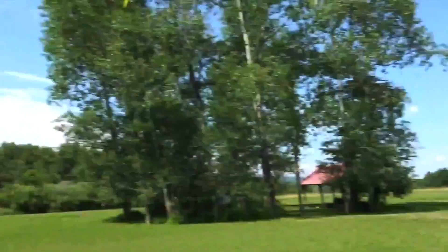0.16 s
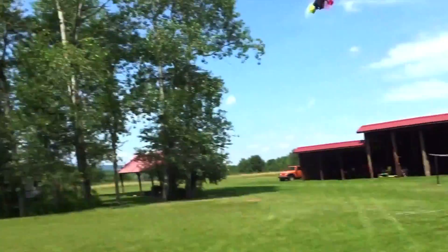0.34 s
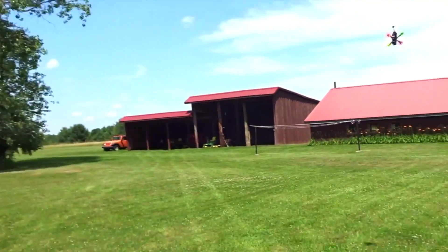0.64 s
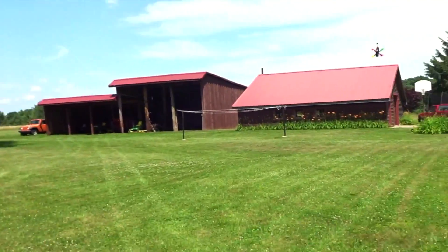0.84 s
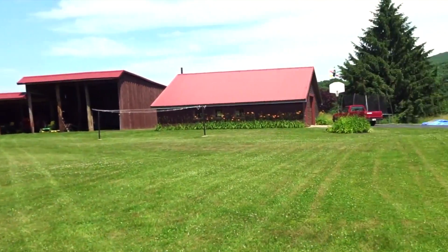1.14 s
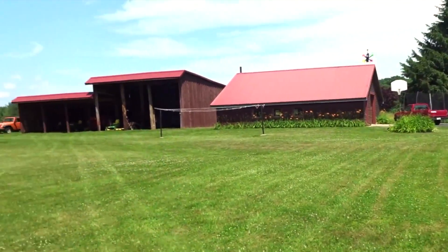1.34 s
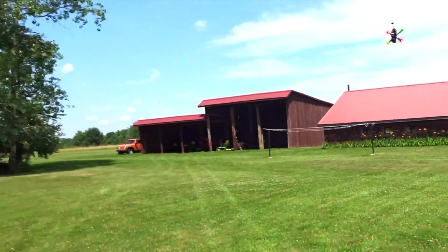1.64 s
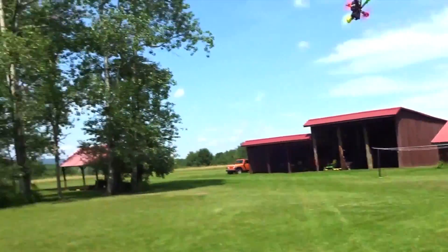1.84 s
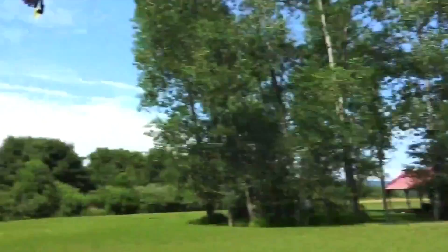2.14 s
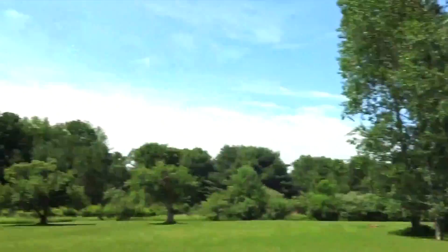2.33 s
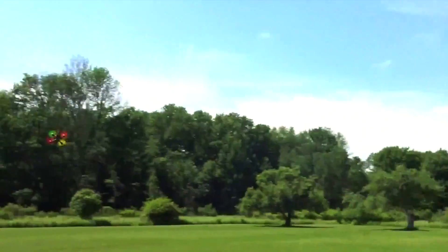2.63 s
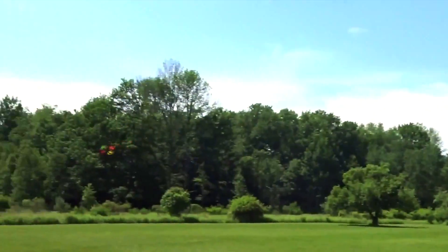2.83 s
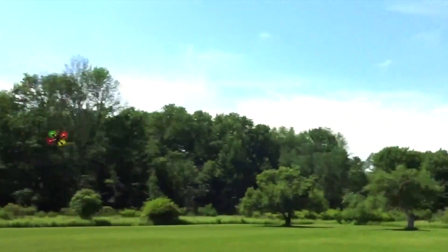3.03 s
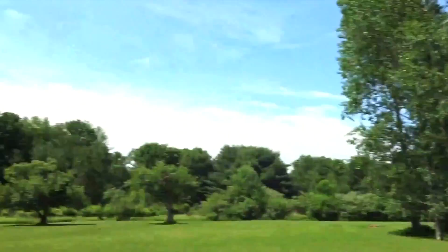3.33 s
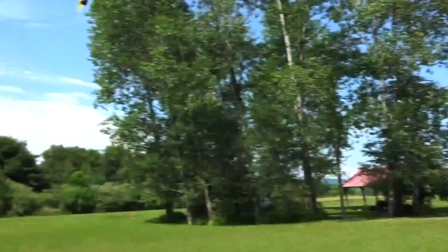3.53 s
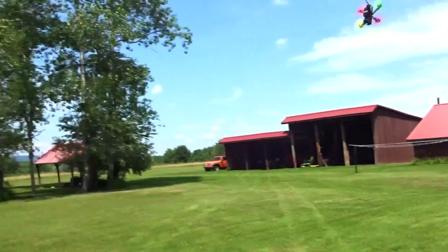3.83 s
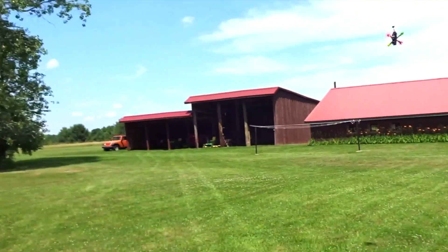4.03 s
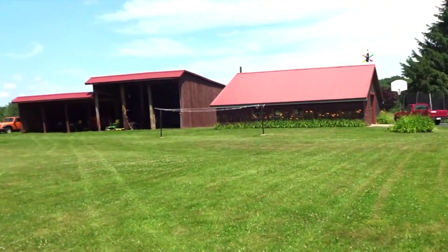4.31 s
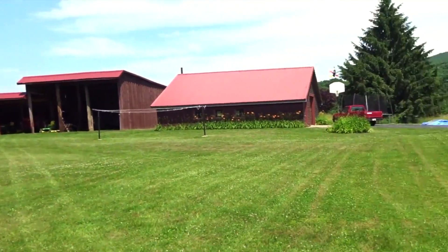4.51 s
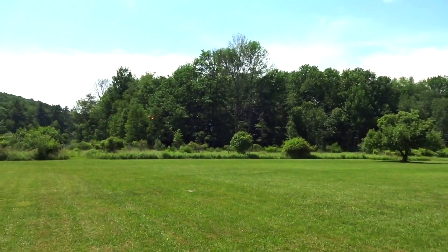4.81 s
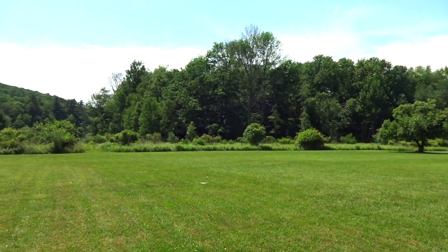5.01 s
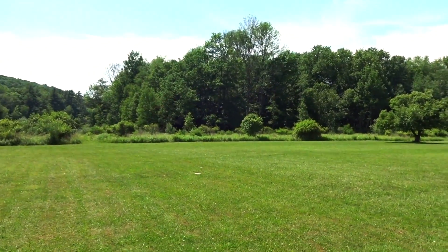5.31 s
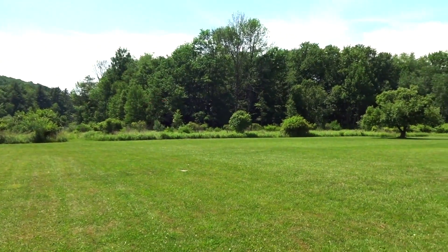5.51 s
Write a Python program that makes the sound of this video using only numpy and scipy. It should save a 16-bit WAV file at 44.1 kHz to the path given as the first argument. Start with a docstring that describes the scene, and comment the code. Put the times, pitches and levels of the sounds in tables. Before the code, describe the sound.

Outdoors on an open lawn, a small four-rotor drone whines very loudly close to a handheld stereo microphone. Its pass plays forward, then backward, then forward again, pitch rising and falling seamlessly. At about 4.65 seconds it cuts abruptly to a far quieter drone, rotors winding down and wavering, followed by a brief airy swoop near the end. Faint wind and slight grass and tree scatter surround it.

```python
"""A racing quadcopter climbs past at full throttle over an open lawn: four rotor whines beat in a hiss of torn air.
The climb is joined midway; it runs forward, backward, then forward again, and cuts off.
The drone is then far away, its rotors spooling down, and swoops past once more, mostly as hiss.
Rotors are sums of blade harmonics, hiss and howls are shaped noise; wind and lawn scatter lie around them."""
import sys
import numpy as np
from scipy import signal
from scipy.fft import rfft, irfft
from scipy.io import wavfile
from scipy.ndimage import map_coordinates

SR = 44100
rng = np.random.default_rng(int(sys.argv[2]) if len(sys.argv) > 2 else 0)


def dump(signal):
    """Clip the signal to [-1, 1] and save it as 16-bit WAV at the path in sys.argv[1]."""
    limited = np.clip(np.atleast_2d(signal).T, -1, 1)
    pcm = np.round(limited * 32767).astype(np.int16)
    wavfile.write(sys.argv[1], SR, pcm)


N = 249517
T, HZ = np.arange(N) / SR, np.fft.rfftfreq(N, 1 / SR)
CUT_S = 4.653  # climb gives way to swoop


def amp(db):
    """Decibels to gain."""
    return 10 ** (np.asarray(db) / 20)


def unit(x):
    """Scales to rms 1."""
    return x / np.sqrt(np.mean(x ** 2) + 1e-20)


def curves(rows):
    """Every column of a table, joined by straight lines in time."""
    s, *columns = np.transpose(rows)
    return [np.interp(T, s, column) for column in columns]


def swell(centre_s, half_width_s):
    """A bell in time: 1 at its centre, 1/e at its half width."""
    return np.exp(-((T - centre_s) / half_width_s) ** 2)


def colour(x, spectrum):
    """Filters by freq_hz, level_db points, joined on a log frequency axis."""
    freq_hz, level_db = np.transpose(spectrum)
    gain_db = np.interp(np.log(HZ + 1), np.log(freq_hz + 1), level_db)
    return irfft(rfft(x) * amp(gain_db), N)


def noise(spectrum, envelope=1):
    """Noise under an envelope, then coloured and scaled to rms 1."""
    return unit(colour(envelope * rng.standard_normal(N), spectrum))


def wander(rate_hz):
    """Smooth random motion of rms 1."""
    return unit(irfft(rfft(rng.standard_normal(N)) / (1 + (HZ / rate_hz) ** 4), N))


def below(x, edge_hz):
    """Gentle low-pass without delay."""
    return irfft(rfft(x) / (1 + (HZ / edge_hz) ** 6), N)


def band_limit(x, edge_hz):
    """Steep low-pass of both channels."""
    taps = signal.firwin(701, edge_hz, window=("kaiser", 10), fs=SR)
    return signal.oaconvolve(x, taps[None], "same")


# wind noise spectrum, relative: freq_hz [Hz], level_db [dB per Hz]
WIND_SPECTRUM = [(15, -20.5), (40, -8.5), (75, -1.5), (130, -2), (190, -5), (400, -26), (1200, -80)]
# gusts on the microphone: centre_s [s], half_width_s [s], level_db [dB]
WIND_GUSTS = [(3.17, 0.016, -42), (3.203, 0.27, -52), (3.685, 0.068, -55.5), (4.69, 0.042, -64),
              (4.756, 0.011, -48)]


def wind(apart=.7):
    """Gusts of low turbulence over a faint breeze, partly different at the two ports."""
    common = noise(WIND_SPECTRUM)
    side = apart * noise(WIND_SPECTRUM)
    breeze_db = -73.5 - 14 * np.clip((T - CUT_S) / 0.51, 0, 1)  # ebbs after the cut
    gusts = sum(amp(level_db) * swell(s, half_width_s) for s, half_width_s, level_db in WIND_GUSTS)
    return (amp(breeze_db) + gusts) * np.array([common + side, common - side])


def lawn(x, echo_db, decay_60db_s=0.32):
    """Faint scatter from grass and trees, different in each channel."""
    t = T[:SR // 2]
    taps = rng.standard_normal((2, len(t))) * amp(-60 * t / decay_60db_s)
    taps /= np.linalg.norm(taps[0])
    return x + amp(echo_db) * signal.oaconvolve(x, taps, axes=1)[:, :N]


# how strongly the microphone ports tell left from right: freq_hz [Hz], side_db [dB]
PORT_SIDE = [(60, -13.5), (300, -6.5), (480, -8), (640, 4), (790, 0.5), (950, -5.5), (1150, -8),
             (3000, -2.5), (6000, -4.5), (8500, -9.5)]


def place(x, pan_db, lean=0.25):
    """Pans a source; the ports are most directional near 800 Hz, where they also lean right."""
    side = colour(x * np.tanh(pan_db * np.log(10) / 40), PORT_SIDE)
    side -= lean * (below(x, 1100) - below(x, 620))
    return np.array([x + side, x - side])


def chop(phases, depth):
    """Envelope that swells each time a blade swings toward the microphone."""
    return unit(np.exp(depth * sum(np.cos(phase) for phase in phases)))


def recut(x, rate_hz, share):
    """Successive blades cut the same eddy: hiss nearly repeats, bunching around multiples of rate_hz."""
    again = map_coordinates(x, [np.arange(N) - SR / rate_hz], order=3, mode="nearest")
    return (x + share * again) / np.sqrt(1 + share ** 2)


# blades howl in their own wake: centre_s [s], half_width_s [s], harmonic [number], level_db [dB]
WAKE_HOWLS = [(3.504, 0.16, 6, -27.5), (3.722, 0.05, 5, -22.5), (5.516, 0.11, 2, -33.5),
              (5.53, 0.092, 4, -29), (5.52, 0.075, 6, -30.5), (5.528, 0.069, 8, -29)]


def howl(phase, width_hz_per_harmonic=30):
    """Blades cut their own wake: ragged noise bands ride on harmonics of one rotor."""
    out = np.zeros(N)
    for s, half_width_s, harmonic, level_db in WAKE_HOWLS:
        turn = harmonic * phase
        width_hz = harmonic * width_hz_per_harmonic
        band = wander(width_hz) * np.cos(turn) + wander(width_hz) * np.sin(turn)
        out += amp(level_db) * swell(s, half_width_s) * band
    return out


# lobes and nulls sweeping over the microphone:
# centre_s [s], half_width_s [s], harmonic [number], gain_db [dB]
BEAM_LOBES = [(3.3, 0.22, 3, 5.5), (3.457, 0.068, 1, -6), (3.486, 0.093, 2, -12), (3.649, 0.1, 1, 11),
              (3.803, 0.04, 3, 6.5), (4.024, 0.056, 4, 4.5), (4.184, 0.045, 3, -11.5),
              (4.504, 0.29, 3, 13.5), (4.689, 0.019, 1, 6), (4.775, 0.056, 1, 10.5), (4.88, .04, 1, -6),
              (5.0, .17, 2, 3.5)]


def beamed(levels_db):
    """Each harmonic beams: it swells in its lobes and fades in its nulls."""
    return [level_db + sum(gain_db * swell(s, half_width_s)
                           for s, half_width_s, harmonic, gain_db in BEAM_LOBES if harmonic == k)
            for k, level_db in enumerate(levels_db, start=1)]


def rotor(blade_hz, levels_db, fall_db, jitter, flutter_db, count):
    """Blade harmonics of one propeller, and its phase; turbulence shakes its speed and each harmonic."""
    shaken_hz = blade_hz * (1 + jitter * wander(46.1))
    phase = 2 * np.pi * (np.cumsum(shaken_hz) / SR + rng.random())
    tone = np.zeros(N)
    for k in range(count):
        last = min(k, len(levels_db) - 1)  # harmonics past the list fall away evenly
        level_db = levels_db[last] - fall_db * (k - last) + flutter_db * wander(25)
        tone += amp(level_db) * np.cos((k + 1) * phase + 2 * np.pi * rng.random())
    return np.sqrt(2) * tone, phase


# swoop hiss spectrum, relative: freq_hz [Hz], level_db [dB per Hz]
SWOOP_SPECTRUM = [(60, -51), (200, -33), (400, -9.5), (650, -3.5), (1100, -2), (2000, -1), (3200, 1.5),
                  (5800, -1.5), (8500, -5), (12000, -12.5), (15500, -22)]
# swoop loudness: time_s [s], air_db [dB], treble_db [dB, offset from air before a fixed lift]
SWOOP_LEVELS = [(4.675, -31.5, -1.5), (4.799, -39, -3), (4.863, -42.5, -5), (5.177, -41, -6),
                (5.223, -39.5, 1), (5.349, -36.5, -6.5), (5.435, -26, -1), (5.557, -24.5, -3.5),
                (5.647, -33, -12), (5.658, -35, -13)]
# steering speeds before spool-down and Doppler, one list per rotor: time_s [s], blade_hz [Hz]
STEERING_SPEEDS = [
    [(4.89, 642), (5.02, 739), (5.23, 783), (5.37, 656), (5.47, 769.6), (5.55, 810), (5.66, 609)],
    [(5.0, 630.7), (5.09, 675), (5.25, 927), (5.42, 885)],
    [(4.95, 627), (5.09, 669), (5.22, 555), (5.34, 600), (5.44, 866)],
    [(4.95, 632), (5.14, 540), (5.3, 579)],
]
SPOOL_EXCESS_HZ, SPOOL_DECAY_S = (540, 590, 494, 572), .125  # extra speed at the cut, time constant
SWOOP_S, DOPPLER_S, DOPPLER_DROP = 5.58, .035, .22  # pass time, drop time scale, share of pitch lost
SWOOP_TRIMS_DB = (-2.5, -0.5, -0.8, -7.0)  # per rotor


def swoop():
    """Throttle drops, rotors fan out to steer, and the drone rushes past, mostly as hiss."""
    air_db, treble_db = curves(SWOOP_LEVELS)
    spool = np.exp(-np.maximum(T - CUT_S, 0) / SPOOL_DECAY_S)
    doppler = 1 - DOPPLER_DROP * (1 + np.tanh((T - SWOOP_S) / DOPPLER_S)) / 2
    speeds_hz = [(curves(rows)[0] + excess_hz * spool) * doppler
                 for rows, excess_hz in zip(STEERING_SPEEDS, SPOOL_EXCESS_HZ)]

    whine_db = .7 * air_db - 25.5  # tones swell less than hiss
    levels_db = beamed([whine_db, whine_db - 7, whine_db - 11.0])
    tones, phases = [], []
    for blade_hz, trim_db in zip(speeds_hz, SWOOP_TRIMS_DB):
        trimmed_db = [db + trim_db for db in levels_db]
        tone, phase = rotor(blade_hz, trimmed_db, fall_db=3.0, jitter=.009, flutter_db=3.5, count=5)
        tones.append(tone)
        phases.append(phase)

    hiss = noise(SWOOP_SPECTRUM, chop(phases, depth=0.12))
    to_body, to_mids = below(hiss, 6300), below(hiss, 5200)
    mids = amp(-0.5) * recut(to_mids, 2 * speeds_hz[0], share=0.099)
    body = amp(1.5) * (to_body - to_mids)
    treble = amp(treble_db + 8.0) * (hiss - to_body)
    air = amp(air_db + 0.72 * wander(25)) * (mids + body + treble)
    return np.tile(sum(tones) + howl(phases[0]) + air, (2, 1))


# shaft-rate multiples that sound: order [number]
SHAFT_LINES = (1, 2, 5, 6, 7, 9)


def shaft(phase, orders_db, flutter_db):
    """Unequal blades add lines at multiples of the shaft rate, a quarter of the blade rate."""
    turn = phase / 4
    return sum(amp(db + flutter_db * wander(11)) * np.cos(order * turn)
               for order, db in zip(SHAFT_LINES, orders_db))


def hum(lead, twin, slow):
    """Shaft lines of three rotors; the lowest two swell on the approach."""
    first_db = -50 + 10 * swell(3.605, 0.37)
    second_db = -46.5 + 6 * swell(3.27, 0.32)
    return (shaft(lead, (first_db, second_db, -46.5, -52, -52, -46.5), flutter_db=3.5)
            + shaft(twin, (first_db - 3.5, second_db + 1, -49.5, -44, -43), flutter_db=3.0)
            + shaft(slow, (first_db - 9.5, -49), flutter_db=2.0))


OVERHEAD_S, PASS_HALF_S = 3.763, .3  # drone overhead, half the passing time
# climb hiss spectrum, relative: freq_hz [Hz], level_db [dB per Hz]
CLIMB_SPECTRUM = [(40, -70), (90, -46), (160, -24), (300, -14.5), (470, -8.5), (700, -11), (1100, -9.5),
                  (2000, -7), (2900, -2), (4600, -3), (5700, -10), (6700, -9), (8600, -18)]


def torn_air(phases, blade_hz, slack):
    """Blade hiss: above the lows it grows with throttle and dips edge-on; it is brightest overhead."""
    hiss = recut(noise(CLIMB_SPECTRUM, chop(phases, depth=.12)), blade_hz, share=0.12)
    to_low, to_body, to_high = below(hiss, 1700), below(hiss, 4500), below(hiss, 7000)
    low, body, high, top = to_low, to_body - to_low, to_high - to_body, hiss - to_high
    overhead, near, edge_on = swell(OVERHEAD_S, 0.19), swell(4.02, 0.69), swell(3.69, 0.038)
    low_db = -22.5 - 3.6 * overhead + 1.2 * slack
    body_db = -19.8 - 4.2 * overhead - 4.6 * edge_on - 7.8 * slack
    high_db = -25 + 10 * near - 12 * edge_on - 5 * slack
    top_db = -23.8 + 8 * overhead + 3.3 * near - 3 * edge_on - 9 * slack
    return amp(low_db) * low + amp(body_db) * body + amp(high_db) * high + amp(top_db) * top


def passing(values):
    """Blends values for coming, overhead and going as the drone crosses the sky."""
    along = (T - OVERHEAD_S) / np.hypot(T - OVERHEAD_S, PASS_HALF_S)
    coming, going = np.minimum(along, 0) ** 2, np.maximum(along, 0) ** 2
    return np.transpose(values) @ np.array([coming, 1 - along ** 2, going])


def dulled(levels_db, slack, loss_db_per_harmonic=9):
    """Slack throttle dulls the upper harmonics."""
    return [db - loss_db_per_harmonic * k * slack ** 2 for k, db in enumerate(levels_db)]


# leading rotor speed: time_s [s], blade_hz [Hz]
LEAD_BLADE = [(2.95, 640.9), (3.06, 745.5), (3.13, 789.7), (3.33, 814.8), (3.48, 820.5), (3.58, 852),
              (3.68, 867.1), (3.9, 925.7), (3.97, 929.8), (4.08, 919), (4.29, 936.7), (4.42, 921),
              (4.65, 916.7)]
# slowest rotor speed: time_s [s], blade_hz [Hz]
SLOW_BLADE = [(2.95, 586.8), (3.12, 689.8), (3.37, 726.8), (3.5, 754), (3.6, 798), (3.97, 873.2),
              (4.1, 863.2), (4.17, 824.4), (4.41, 795), (4.65, 796.7)]
# middle rotor speed: time_s [s], share [0..1 of the way from slowest to leading]
MIDDLE_BLADE = [(2.95, 0.461), (3.3, .38), (3.72, .8), (4.1, .72), (4.65, .1)]
# leading rotor harmonics; rows coming, overhead, going: h1_db .. h5_db [dB]
LEAD_HARMONICS = [(-27, -28.5, -28, -35, -38), (-29.5, -26, -31.5, -31.5, -31),
                  (-27, -24.5, -33.5, -25, -34.5)]
# middle rotor harmonics; rows coming, overhead, going: h1_db .. h4_db [dB]
MIDDLE_HARMONICS = [(-35.5, -41, -54, -59), (-32, -37.5, -31.5, -46.5), (-35.5, -39.5, -36.5, -49.5)]
# slowest rotor harmonics; rows coming, overhead, going: h1_db .. h5_db [dB]
SLOW_HARMONICS = [(-36.5, -36.5, -37.5, -36, -33), (-33, -28.5, -26.5, -28.5, -33),
                  (-38.5, -36.5, -36, -33.5, -35)]
# twin's harmonics against the leading rotor's: h1_db .. h5_db [dB]
TWIN_OFFSETS = (-5.5, -6, -10.5, -8.5, -13.5)
# drone direction: time_s [s], left_right_db [dB, positive left]
CLIMB_BEARING = [(2.95, 2.9), (3.52, 3), (3.8, -2.5), (4.05, -5), (4.65, -2.5)]
TWIN_LAG_HZ, TWIN_HUNT_HZ = (8, 18, 18.5), 2.026  # lag coming, overhead, going; rms speed hunting
FULL_HZ, SLACK_HZ = 803.5, 638.4  # blade rates of full and slack throttle


def climb():
    """Four rotors at full throttle beat against each other inside their own hiss."""
    lead_hz, slow_hz = curves(LEAD_BLADE)[0], curves(SLOW_BLADE)[0]
    middle_hz = slow_hz + curves(MIDDLE_BLADE)[0] * (lead_hz - slow_hz)
    twin_hz = lead_hz - passing(TWIN_LAG_HZ) + TWIN_HUNT_HZ * wander(4.8)
    slack = np.clip((FULL_HZ - lead_hz) / (FULL_HZ - SLACK_HZ), 0, 1)

    lead_db = dulled(passing(LEAD_HARMONICS), slack)
    twin_db = [db + offset_db for db, offset_db in zip(lead_db, TWIN_OFFSETS)]
    middle_db = dulled(passing(MIDDLE_HARMONICS), slack)
    slow_db = dulled(passing(SLOW_HARMONICS), slack)

    lead, lead_phase = rotor(lead_hz, beamed(lead_db), fall_db=4.5, jitter=0.00149, flutter_db=2.0, count=9)
    twin, twin_phase = rotor(twin_hz, twin_db, fall_db=9, jitter=0.0013, flutter_db=3.0, count=9)
    middle, middle_phase = rotor(middle_hz, middle_db, fall_db=7.5, jitter=0.00083, flutter_db=0.4, count=9)
    slow, slow_phase = rotor(slow_hz, slow_db, fall_db=2.5, jitter=0.0013, flutter_db=1.0, count=9)

    twin = twin * amp(-12 * swell(3.65, 0.18))  # fades while the discs are edge-on
    lesser = twin + middle + slow + hum(lead_phase, twin_phase, slow_phase)
    lesser = amp(-7 * slack ** 2) * lesser
    air = torn_air((lead_phase, twin_phase, middle_phase, slow_phase), lead_hz, slack)
    return place(lead + lesser + howl(lead_phase) + air, curves(CLIMB_BEARING)[0])


LOOP_START_S, LOOP_END_S, LOOP_EDGE_HZ = 2.94983, 4.65153, 8750


def rocked(x, blend_s=0.0087):
    """Plays the climb back and forth in time, dull at the top."""
    start, length = round(LOOP_START_S * SR), round((LOOP_END_S - LOOP_START_S) * SR)
    at = start + abs((np.arange(N) - start + length) % (2 * length) - length)
    turn = start + length * (at > start + length // 2)  # nearest turning point
    beyond = np.clip(2 * turn - at, 0, N - 1)
    # both directions blend at a turn, so it does not click
    share = np.interp(abs(at - turn) / SR, [0, blend_s], [.5, 0])
    return band_limit((1 - share) * x[:, at] + share * x[:, beyond], LOOP_EDGE_HZ)


def scene():
    """The rocking climb gives way abruptly to the swoop."""
    climbing = np.clip((CUT_S - T) / .016 + .5, 0, 1)  # 16 ms crossfade
    gusts = wind()
    close = rocked(lawn(climb(), echo_db=-22, decay_60db_s=.2) + gusts)
    far = lawn(swoop(), echo_db=-29) + gusts
    return climbing * close + (1 - climbing) * far


def record(dry, edge_hz=15730):
    """The recorder's band limit."""
    return band_limit(dry, edge_hz)


dry = scene()
out = record(dry)
dump(out)
```